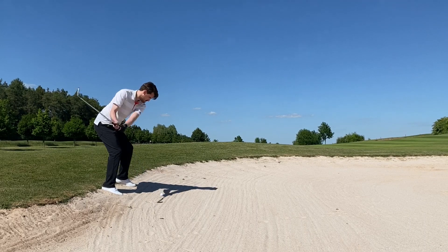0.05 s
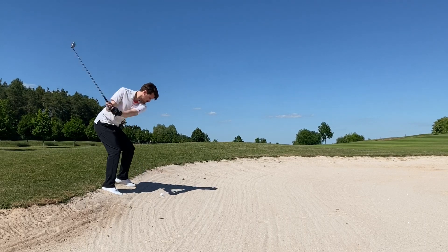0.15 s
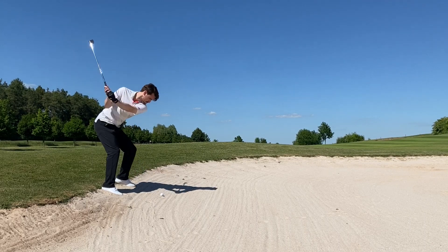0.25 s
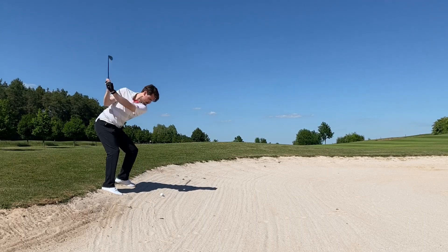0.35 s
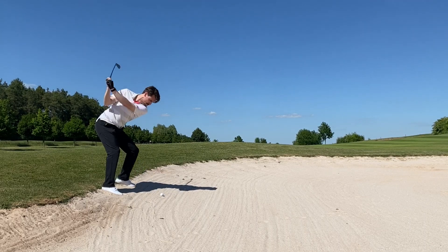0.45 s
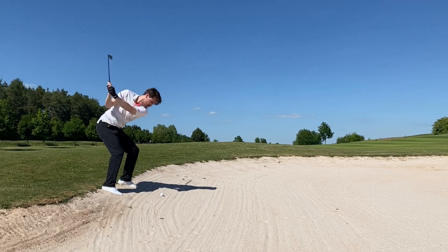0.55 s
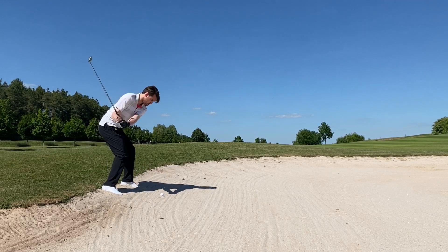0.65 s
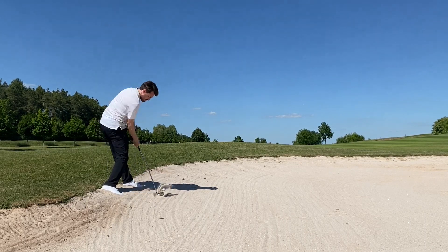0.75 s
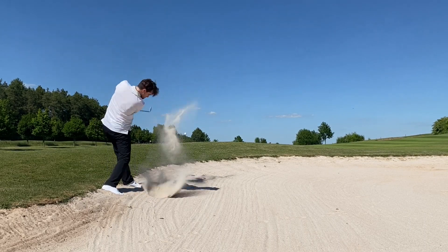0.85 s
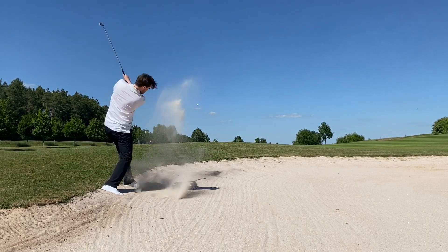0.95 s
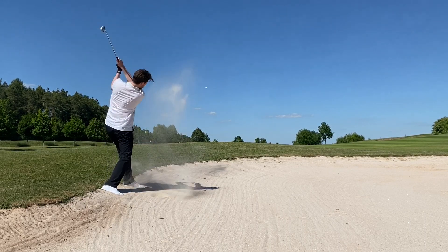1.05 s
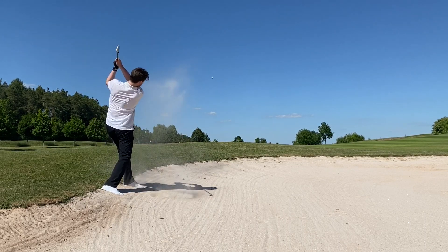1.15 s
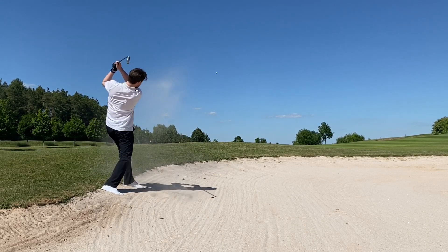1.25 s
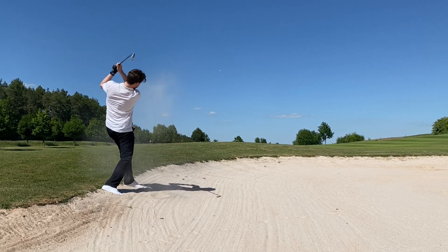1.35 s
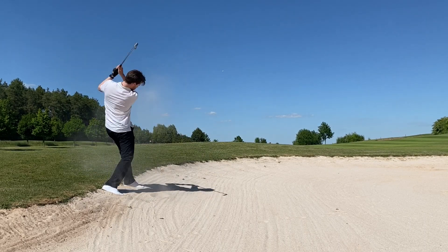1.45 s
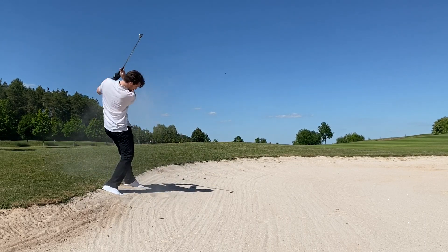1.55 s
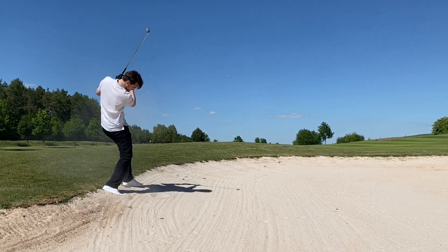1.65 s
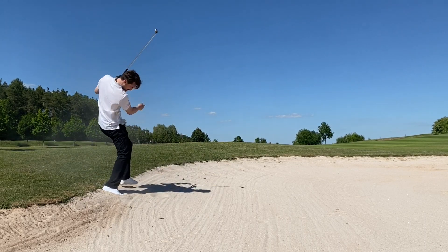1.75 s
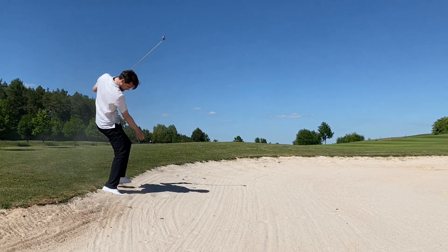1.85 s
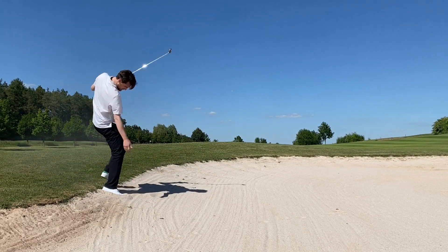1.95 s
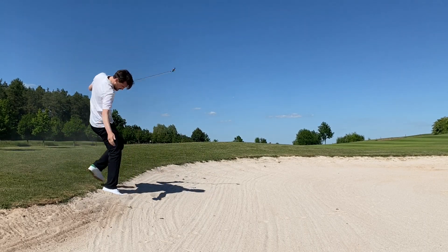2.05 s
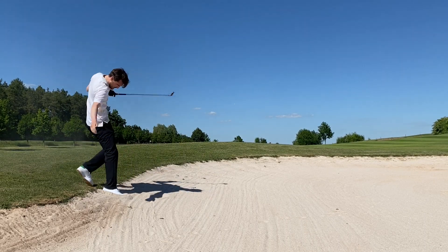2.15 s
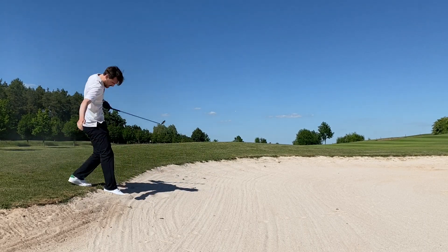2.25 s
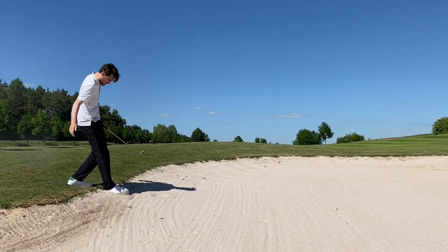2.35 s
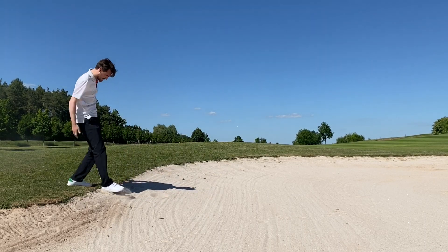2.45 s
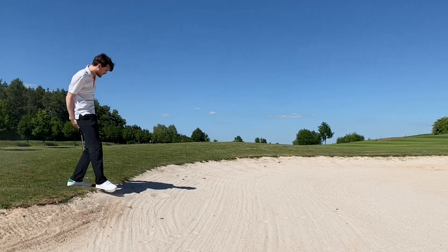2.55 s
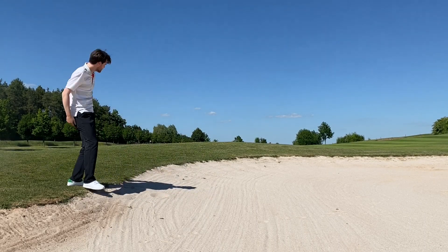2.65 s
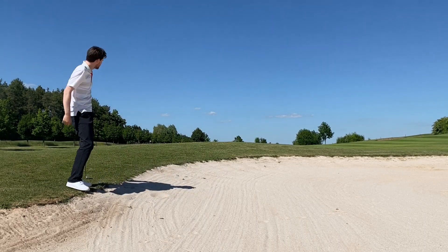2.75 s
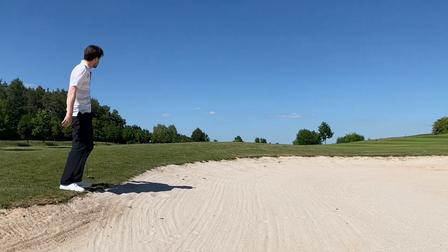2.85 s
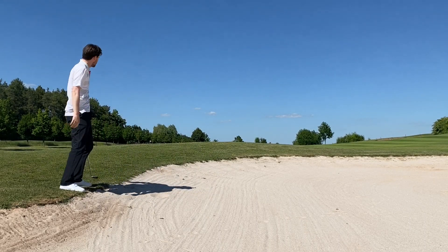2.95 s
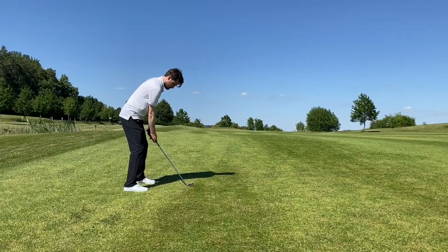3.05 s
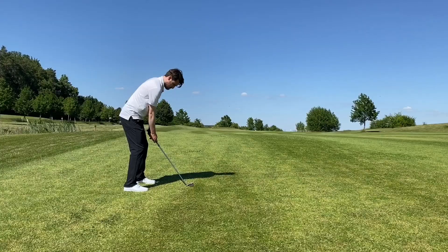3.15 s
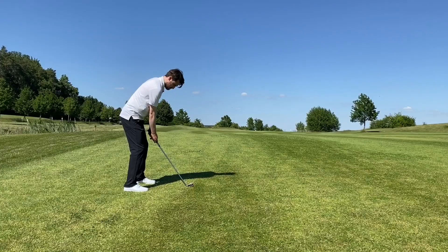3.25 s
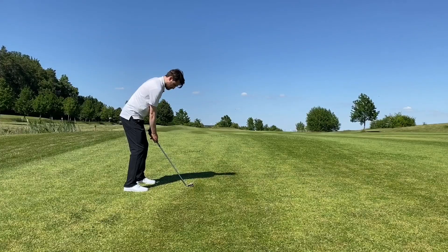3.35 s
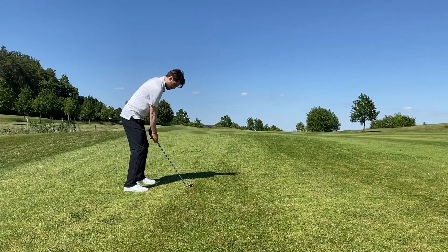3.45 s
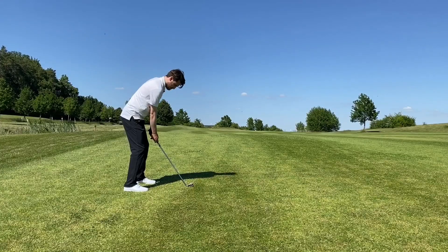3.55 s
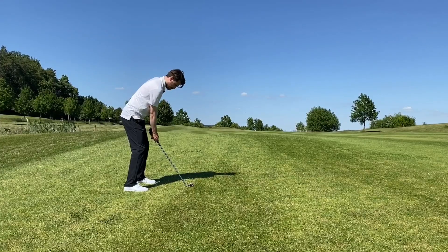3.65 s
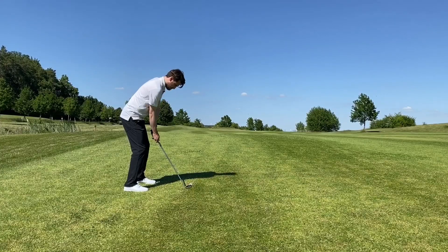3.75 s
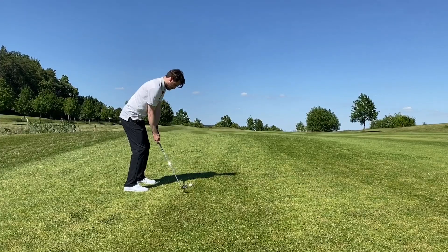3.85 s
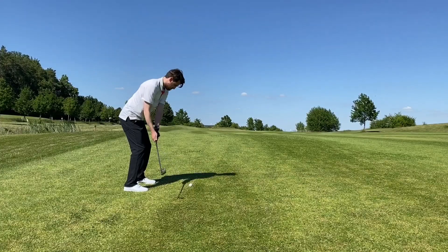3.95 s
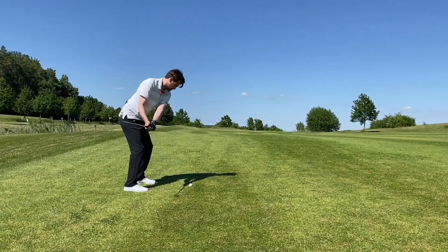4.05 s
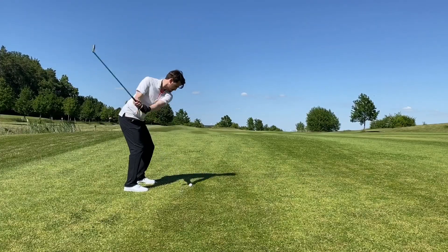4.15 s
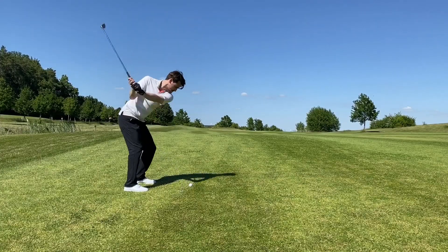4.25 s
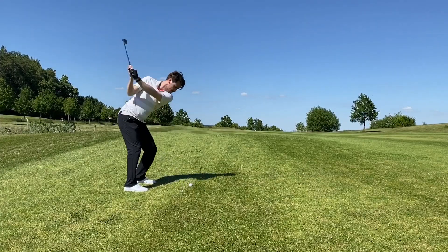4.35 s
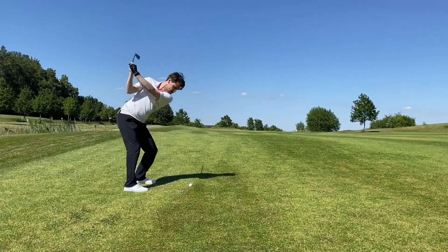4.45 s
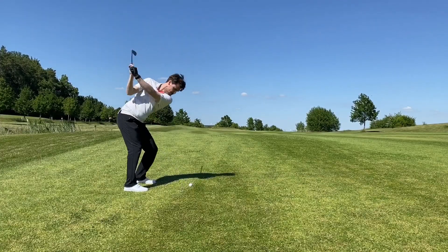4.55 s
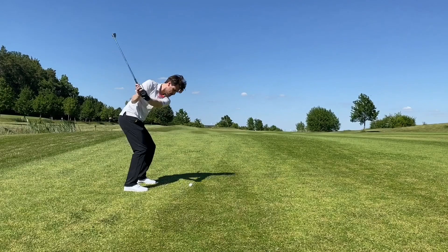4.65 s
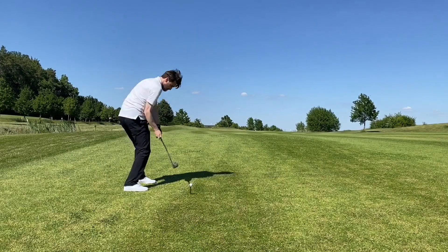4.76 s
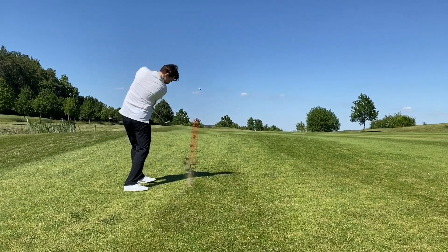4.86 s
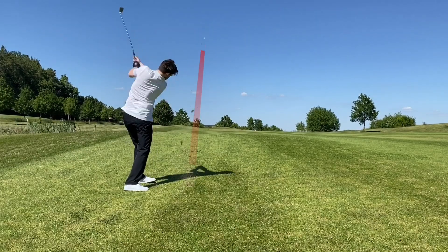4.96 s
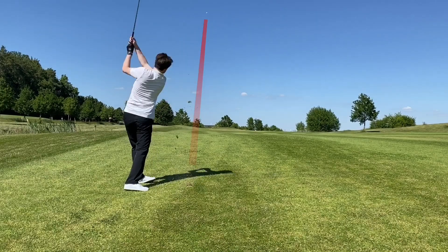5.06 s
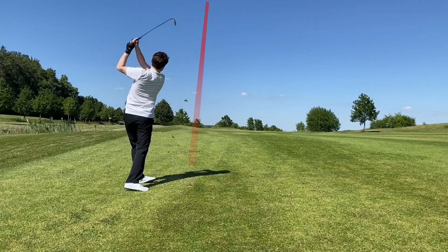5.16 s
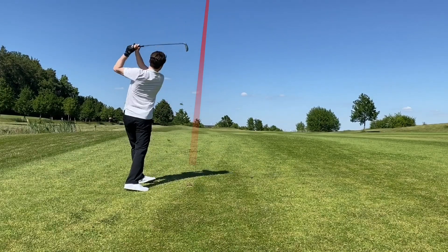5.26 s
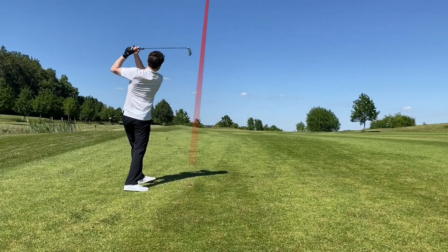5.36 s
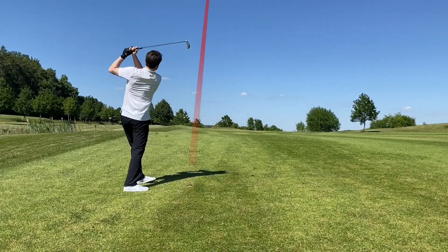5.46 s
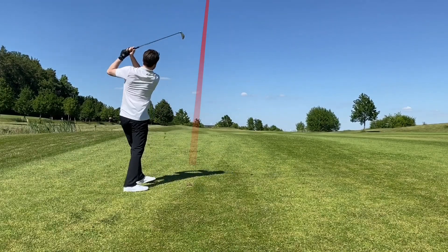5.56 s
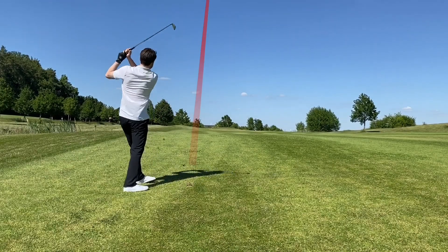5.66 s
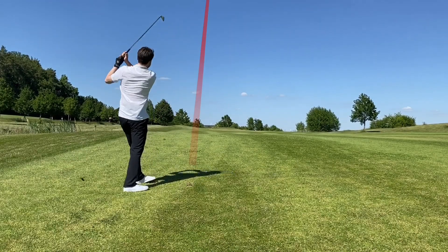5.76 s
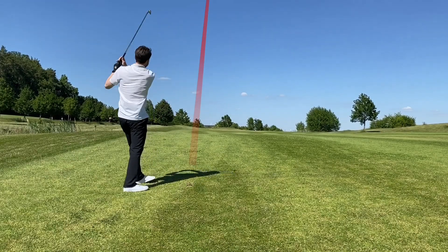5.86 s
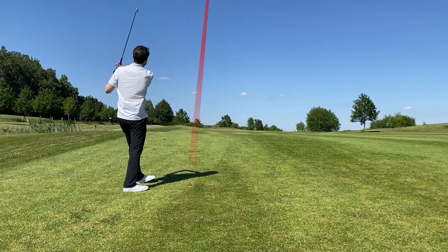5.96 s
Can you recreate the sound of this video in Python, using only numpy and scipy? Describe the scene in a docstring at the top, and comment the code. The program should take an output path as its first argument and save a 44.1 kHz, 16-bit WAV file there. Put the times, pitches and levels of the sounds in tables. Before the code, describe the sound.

On an open golf course, a club swishes and hits sand with a short, thudding crack and a quick grainy spray. Soft rustles follow, then a duller knock of club on shoe. After a change of place, another swish ends in a brighter, sharper iron strike. Small birds whistle faintly, foliage hisses, and wind rumbles low on the stereo microphone, a few metres from the golfer.

```python
"""Golf shots on an open course

A bunker shot throws sand, a club knocks on a shoe, then an iron strikes off the fairway.
Swings are speed-driven noise and shaft tone; blows are filtered impulses, grit noise and damped modes.
Wind is shaped noise with low pressure pulses at the microphone.
Small birds whistle along pitch contours, scattered by the edge of a wood."""
import sys
import numpy as np
from scipy import signal
from scipy.fft import rfft, irfft, next_fast_len
from scipy.io import wavfile
from scipy.ndimage import map_coordinates

SR = 44100
rng = np.random.default_rng(int(sys.argv[2]) if len(sys.argv) > 2 else 0)


def wav_out(sig):
    """Save sig, one row per channel (or a flat mono array), as 16-bit PCM at SR to the path in sys.argv[1]."""
    wavfile.write(sys.argv[1], SR, np.round(np.clip(np.atleast_2d(sig).T, -1, 1) * 32767).astype(np.int16))


N = 264375


def amp(db):
    """Level in decibels to amplitude ratio."""
    return 10 ** (np.asarray(db) / 20)


def unit(x):
    """Normalisation to a root-mean-square of 1."""
    return x / np.sqrt(np.mean(x ** 2) + 1e-20)


def along(points, hz):
    """Interpolation of (frequency [Hz], value) points on a logarithmic frequency axis."""
    f, v = np.transpose(points)
    return np.interp(np.log(hz + 1), np.log(f), v)


def curves(rows):
    """Linear interpolation in time: one value per sample for each column after the time."""
    s, *cols = np.transpose(rows)
    return [np.interp(np.arange(N) / SR, s, c) for c in cols]


def filtered(x, response):
    """Linear filtering: the spectrum of x times a response of frequency."""
    m = next_fast_len(N + SR // 2)
    return irfft(rfft(x, m) * response(np.fft.rfftfreq(m, 1 / SR)), m)[..., :N]


def dull(x, hz):
    """Causal second-order low-pass, with its cutoff held below the Nyquist frequency."""
    return signal.lfilter(*signal.butter(2, min(hz, SR / 2 - SR / 20), fs=SR), x)


def noise(spectrum, grain_db=0):
    """Coloured noise of rms 1; uneven sample sizes make it gritty."""
    grain = amp(grain_db * np.clip(rng.standard_normal(N), -2, 2))
    white = rng.standard_normal(N) * grain
    return unit(filtered(white, lambda hz: amp(along(spectrum, hz))))


def add(track, s, sound):
    """Superposition of a short sound onto a track from time s."""
    part = track[max(round(s * SR), 0):][:len(sound)]
    part += sound[:len(part)]


def since(s):
    """Seconds elapsed after time s, zero before it."""
    return np.maximum(np.arange(N) / SR - s, 0)


def bump(s, width):
    """A Gaussian swell that peaks at 1 at time s."""
    return np.exp(-((np.arange(N) / SR - s) / width) ** 2)


def swell(t, rise):
    """An envelope that peaks at 1 after rise seconds and dies away."""
    return t / rise * np.exp(1 - t / rise)


def wobble(rate):
    """Slow random modulation: a smooth curve through rate random knots a second."""
    knots = rng.standard_normal(int(N * rate / SR) + 4)
    return map_coordinates(knots, [np.arange(N) * rate / SR])


def pushes(rows, stretch):
    """Low pressure pulses whose period lengthens as they die."""
    out, t = np.zeros(N), np.arange(SR // 5) / SR
    for s, db, hz, rise in rows:
        cycles = np.log1p(stretch * hz * t) / stretch
        add(out, s, amp(db) * swell(t, rise) ** 1.2 * np.sin(2 * np.pi * cycles))
    return out


def eddies(strength_db, count=36):
    """Turbulent pressure: a few strong eddies, and small ones by chance that follow the wind's strength."""
    # strongest eddies: (time [s], level [dB], start frequency [Hz], rise [s])
    strong = [(.222, -43.5, 302, .0066), (.477, -43.5, 304, 0.0035), (1.398, -43, 302, 0.0049),
              (1.986, -41, 349, .0048), (2.121, -41, 297, 0.0069), (3.198, -42.5, 330, 0.0055),
              (3.282, -43.5, 300, .011), (3.345, -42.5, 420, .0055), (3.591, -39.5, 400, 0.009),
              (3.715, -43, 453, 0.011), (3.741, -36, 482, .01), (4.517, -40.5, 179.7, .012),
              (4.76, -33.5, 335, .011), (4.792, -34.5, 150, .018), (4.875, -33.5, 242, .012),
              (4.8995, -20, 420, .0105), (5.044, -31, 257, .012)]
    small_db, small_hz, small_rise_s = 4, 340, .006  # level over the wind's strength, mid pitch, rise
    chance = []
    for u, size in rng.random((count, 2)):
        level_db = strength_db[int(u * N)] + small_db
        chance.append((u * N / SR, level_db, small_hz * 2 ** (size - .5), small_rise_s))
    return pushes([*strong, *chance], stretch=.522)


def wind():
    """Turbulence: rumble, flutter growing faster in gusts, eddies, and a rush of opposite polarity at two ports."""
    # steady breeze: (time [s], strength [dB])
    breeze = [(0.0, -66), (0.5, -61.5), (0.92, -63), (1.62, -62.5), (2.03, -53), (2.43, -55.5),
              (2.74, -61.5), (2.92, -61.5), (3.52, -50.5), (3.7, -49.5), (3.94, -60.5), (4.07, -59),
              (4.74, -55.5), (4.87, -49.5), (4.97, -51.5), (5.29, -60), (5.57, -59.5), (5.99, -55)]
    # gusts: (time of peak [s], strength over the breeze [dB], half-width [s])
    gusts = [(.26, 7.5, 0.038), (1.06, 5.5, 0.096), (1.4, 4.5, .08), (2.62, 4.5, 0.072), (2.96, 6, .05),
             (3.29, 4, .1), (3.735, 11, 0.042), (3.87, 4.5, 0.044), (4.215, 7.5, .035), (5.83, 5.5, .04)]
    # spectra of the deep rumble and the flutter: (frequency [Hz], density [dB per Hz])
    rumble_colour = [(15, -32.5), (28, -13), (45, 1), (70, 2), (110, -2.5), (170, -9.5), (280, -18.5),
                     (450, -43), (800, -75)]
    flutter_colour = [(60, -28), (150, -8.5), (290, 0.5), (400, -6), (600, -21.5), (1200, -43),
                      (3000, -69.5)]
    # spectrum of the wind's opposed rush: (frequency [Hz], density [dB per Hz])
    rush_colour = [(150, -50), (300, -15.5), (520, -0.5), (950, 1), (1500, -11.5), (3000, -24.5),
                   (8000, -44.5)]

    strength_db = curves(breeze)[0] + sum(db * bump(s, width) for s, db, width in gusts)
    lumps = unit(amp(2.2 * wobble(28)))
    rumble = amp(strength_db + 1) * noise(rumble_colour)
    flutter = amp(1.604 * strength_db + 19) * noise(flutter_colour)
    opposed = np.array([[1], [-1]])  # opposite polarity at the two ports
    rush = amp(0.74 * strength_db - 36.5) * noise(rush_colour) * opposed
    return lumps * (rumble + flutter) + rush + eddies(strength_db)


def air():
    """Diffuse sound: independent left and right foliage noise by place, and a faint high hiss at 14 to 16 kHz."""
    # spectra of distant foliage at each place: (frequency [Hz], density [dB per Hz])
    bunker_colour = [(210, -34.5), (350, -4.5), (505, -8.5), (652, -8), (1210, -11), (1310, -15.5),
                     (1520, -7.5), (2740, -14.5), (3060, -15), (5340, -23.5), (6070, -25), (7960, -32),
                     (11500, -35), (15800, -50.5)]
    fairway_colour = [(210, -41), (350, -6.5), (513, -2), (621, -8), (940, -10.5), (1640, -19.5),
                      (2960, -16), (3650, -19.5), (4780, -20), (6570, -27.5), (7840, -36), (11500, -39),
                      (13300, -43.5), (15800, -49)]
    # stretches of faint high hiss: (start [s], length [s], level [dB], fading [dB per s])
    hisses = [(.8, 2.1, -85.5, 4.5), (4.65, 1.34, -91.5, 6)]
    move_s, bunker_db, fairway_db = 3.06, -75, -71.5  # change of place, foliage level at each

    bunker = np.array([noise(bunker_colour), noise(bunker_colour)])
    fairway = np.array([noise(fairway_colour), noise(fairway_colour)])
    trees = np.where(np.arange(N) / SR < move_s, amp(bunker_db) * bunker, amp(fairway_db) * fairway)
    hiss = noise([(11000, -31), (14300, -1.5), (15700, -2), (16200, -31.5)])
    hiss_gain = np.zeros(N)
    for s, length, db, fading in hisses:
        sounding = (since(s) > 0) * (since(s) < length)
        hiss_gain += sounding * amp(db - fading * since(s))
    return amp(.5 * wobble(3)) * trees + hiss_gain * hiss


def whistle(hz):
    """Frequency modulation: a softly rounded pure note whose phase integrates a pitch contour."""
    envelope = np.sqrt(np.abs(np.sin(np.linspace(0, np.pi, len(hz)))))
    return envelope * np.sin(2 * np.pi * np.cumsum(hz) / SR)


def note(length, start_hz, middle_hz, end_hz):
    """A whistle whose pitch follows a parabola through three frequencies."""
    u = np.linspace(0, 1, max(int(length * SR), 2))
    contour = np.polyfit([0, .5, 1], [start_hz, middle_hz, end_hz], 2)
    return whistle(np.polyval(contour, u))


def slur(length, hz, slide):
    """A whistle that starts off its final pitch and settles on it along a Gaussian glide."""
    t = np.arange(int(length * SR)) / SR
    slide_s = min(0.44 * length, 0.027)  # a share of a short note, limited in a long one
    return whistle(hz * (1 + slide * np.exp(-(t / slide_s) ** 2)))


def phrase(count=7):
    """Pitch contours in sequence: strokes, then a sinking, fading trill with small random variations."""
    # two upstrokes, the second arched:
    # (time in phrase [s], length [s], start [Hz], middle [Hz], end [Hz], relative level [dB])
    strokes = [(0, .02, 2250, 2430, 2650, -1), (.02, .05, 2420, 2990, 2783, 0)]
    trill_after_s, trill_gap_s, trill_note_s = .075, .0165, .014
    base_hz, first_lift, fall = 2257, .2, 0.24  # lift and fall as shares of the pitch
    fade_db = 1.5  # loss a note

    out = np.zeros(SR // 2)
    for s, length, start, middle, end, db in strokes:
        add(out, s, amp(db) * note(length, start, middle, end))
    for k in range(count):
        hz = base_hz * (1 + first_lift * np.exp(-k) + rng.normal(0, .012))
        falling = note(trill_note_s, hz, hz * (1 - fall / 2), hz * (1 - fall))
        start = trill_after_s + k * trill_gap_s + rng.normal(0, .001)
        add(out, start, amp(rng.normal(0, 1) - fade_db * k) * falling)
    return out


def wood_echo(x, t60):
    """Scattering by trunks: convolution with an exponentially decaying tail, different on each side."""
    t = np.arange(SR // 2) / SR
    tail = rng.standard_normal((2, len(t))) * np.exp(-np.log(1000) * t / t60)
    return signal.fftconvolve(x[None], tail / np.linalg.norm(tail[0]), axes=1)[:, :N]


def birds():
    """Tonal song, near and far, joined by its reverberation among the trees."""
    # whistles that glide to a pitch:
    # (time [s], length [s], final pitch [Hz], starting offset [share of pitch], relative level [dB])
    slurs = [(.1, .1, 3296, 0.13, -68), (0.199, .06, 3000, .12, -70), (0.271, 0.052, 3620, .09, -70.5),
             (0.327, .1, 2926, .27, -63.5), (.53, 0.11, 3265, 0.093, -66.5),
             (.99, 0.078, 3220, 0.084, -67.5), (1.2, .08, 3040, 0.13, -71.5), (1.46, .14, 3250, 0.057, -74),
             (2.451, 0.058, 3130, 0.087, -66.5), (2.674, .048, 2850, .15, -65),
             (2.786, .049, 4880, .14, -66), (3.347, 0.044, 2690, .36, -62.5),
             (3.435, .06, 3230, 0.025, -68.5), (4.26, .075, 2470, .18, -70.5),
             (4.928, 0.078, 3120, .09, -69.5), (5.28, .16, 2520, -.06, -71.5),
             (5.475, .09, 3095, 0.027, -72), (5.725, .11, 3010, 0.15, -68), (5.915, .05, 3880, .11, -73),
             (5.955, .045, 3200, 0.072, -69.5)]
    # sharp falling chips: (time [s], relative level [dB])
    chips = [(2.581, -64), (2.728, -66), (2.822, -62)]
    # shape of every chip: (length [s], start [Hz], middle [Hz], end [Hz])
    chip_shape = (.015, 4920, 4130, 3100)
    # each singing of the warbled phrase: (time [s], relative level [dB])
    warbles = [(3.657, -58.5), (4.14, -61.5)]
    # single calls: (time [s], length [s], start [Hz], middle [Hz], end [Hz], relative level [dB])
    bent_calls = [(3.391, .066, 2960, 3235, 2580, -61), (3.916, .012, 2640, 2400, 2150, -59),
                  (3.947, .04, 2996, 2960, 2700, -68), (3.96, .05, 1894, 2180, 1750, -62)]
    # twitters deep in the wood:
    # (time [s], length [s], mean pitch [Hz], sweep to each side [share of pitch], relative level [dB])
    twitters = [(.5, .031, 5400, .12, -75.5), (.62, .14, 5140, .08, -81.5), (1.862, .034, 3980, 0.13, -78),
                (1.947, .035, 3650, .12, -76), (3.12, .14, 4790, .07, -77), (3.32, .025, 3810, 0.084, -70),
                (3.523, .035, 5060, .1, -75)]

    song, far = np.zeros(N), np.zeros(N)
    for s, length, hz, slide, db in slurs:
        add(song, s, amp(db) * slur(length, hz, slide))
    for s, db in chips:
        add(song, s, amp(db) * note(*chip_shape))
    for s, db in warbles:
        add(song, s, amp(db) * phrase())
    for s, length, start, middle, end, db in bent_calls:
        add(song, s, amp(db) * note(length, start, middle, end))
    for s, length, hz, sweep, db in twitters:
        for start in np.arange(s, s + length, .013):
            pitch = hz * np.exp(0.058 * rng.standard_normal())
            rising = note(.018, pitch * (1 - sweep), pitch, pitch * (1 + sweep))
            add(far, start, amp(db + rng.normal(0, 2)) * rising)
    song = song * amp(1.8 * wobble(70))  # moving air makes the song flutter
    near = amp(-4) * song + amp(-6) * wood_echo(song, t60=0.46)
    return near + amp(-5) * far + wood_echo(far, t60=0.3)


def swings():
    """Aerodynamic noise: the head tears the air while the shaft sheds a hollow tone that follows its speed."""
    # (time of top speed [s], half-width of speed peak [s], swish level [dB],
    #  shaft tone at top speed [Hz], shaft tone level [dB], downswing whisper level [dB])
    strokes = [(.793, .055, -51.5, 385, -53, -70), (4.636, .048, -50.5, 520, -54.5, -82)]
    # spectrum of the torn air: (frequency [Hz], density [dB per Hz])
    swish_colour = [(150, -33.5), (250, -5), (492, -3), (684, -9.5), (918, -5), (1740, -13), (1870, -18),
                    (2110, -11.5), (3090, -15.5), (5480, -25.5), (15800, -42.5)]
    swish_power, shaft_bend = 3.0, .25  # swish amplitude and shaft pitch as powers of speed
    shaft_lag_s, shaft_width_s = .045, .075  # the shaft sings on into the follow-through
    whisper_lead_s, whisper_width_s = .13, 0.13  # the slower start of the downswing

    out, swish = np.zeros(N), noise(swish_colour)
    # slow random modulation spreads the tone into a narrow band
    spread = np.array([unit(dull(rng.standard_normal(N), hz=65)) for _ in range(2)])
    for s, width, swish_db, hz, shaft_db, whisper_db in strokes:
        speed = 1 / (1 + ((np.arange(N) / SR - s) / width) ** 2)
        phase = 2 * np.pi * np.cumsum(hz * speed ** shaft_bend) / SR
        tone = unit(spread[0] * np.cos(phase) + spread[1] * np.sin(phase))
        whisper = amp(whisper_db) * bump(s - whisper_lead_s, whisper_width_s)
        torn = amp(swish_db) * speed ** swish_power + whisper
        out += torn * swish
        out += amp(shaft_db) * bump(s + shaft_lag_s, shaft_width_s) * tone
    return out


def ring(s, modes, attack):
    """Modal decay: damped sinusoids set going at time s by a contact that builds up softly."""
    out, t = np.zeros(N), np.arange(SR // 10) / SR
    tone = np.zeros(len(t))
    for hz, db, t60 in modes:
        tone += amp(db) * np.exp(-np.log(1000) * t / t60) * np.sin(2 * np.pi * hz * t)
    add(out, s, tone * (1 - np.exp(-t / attack)) ** 2)
    return out


def blows():
    """Impact: each blow is a crack with its ground reflection, crushed grit and a very short modal ring."""
    # hard contacts: (time [s], impulse level [dB], low-pass cutoff [Hz])
    clicks = [(0.8134, -7, 2200), (.818, -18, 2500), (2.5545, -14, 1600), (2.5592, -20, 1700),
              (4.6639, -7, 17500)]
    # grit crushed under club or shoe: (time [s], level [dB], rise [s], low-pass cutoff [Hz])
    crunches = [(.8138, -41, .00041, 17000), (.8168, -36.5, .0018, 2400), (.8165, -43.5, .0013, 17000),
                (2.381, -61, 0.0019, 1300), (2.5495, -48.5, 0.0018, 2700), (2.5538, -41, .0021, 1550),
                (2.5535, -51.5, 0.0021, 13000), (4.6636, -32.5, .0014, 17000), (4.6643, -23, .0012, 2400),
                (4.922, -63.5, 0.0041, 14000)]
    # modes of each struck body: (frequency [Hz], level [dB], decay time t60 [s])
    wedge = [(390, -26, 0.013), (642.4, -29, .015), (850, -23.5, .018), (1392, -26.5, 0.018),
             (1680, -31.5, .02), (2045, -42, .02), (2920, -44.5, .02)]
    wedge_face = [(9940, -18.5, .008), (10470, -14.5, 0.01)]
    shoe = [(682, -31.5, 0.024), (830, -30.5, 0.025), (1275, -41, 0.026), (1664, -29.5, 0.027),
            (2080, -36.5, .018), (2600, -39.5, 0.02), (3700, -60, .018)]
    iron = [(345, -19.5, 0.022), (520, -30.5, 0.0072), (1000, -25.5, 0.019), (1450, -14.5, 0.015),
            (1840, -26, .012), (2400, -21, 0.01), (2750, -27, 0.017), (3277, -35, .028),
            (7040, -42.5, 0.014)]
    ground_s = .000588  # delay of the ground reflection

    out, t = np.zeros(N), np.arange(SR // 20) / SR
    for s, db, hz in clicks:
        crack = amp(db) * dull(t == 0, hz)
        add(out, s, crack)
        add(out, s + ground_s, 1.3 * crack)
    for s, db, rise, hz in crunches:
        grit = unit(dull(rng.standard_normal(len(t)), hz))
        add(out, s, amp(db) * swell(t, rise) * grit)
    out = signal.lfilter(*signal.butter(1, 350, "high", fs=SR), out)  # small things radiate little bass
    bunker = ring(.8174, wedge, attack=0.00023) + ring(.8165, wedge_face, attack=.002)
    return out + bunker + ring(2.5541, shoe, attack=0.00015) + ring(4.6652, iron, attack=0.00015)


def thumps():
    """Low thumps of club head or shoe on the ground, as short pulses whose period lengthens."""
    # (time [s], level [dB], start frequency [Hz], rise [s])
    ground_thumps = [(.8145, -26.5, 382, 0.0027), (.8215, -30, 190, .0037), (2.528, -43.5, 400, 0.0067),
                     (2.588, -42, 480, 0.0086), (4.6665, -27.5, 370.3, .005)]
    return pushes(ground_thumps, stretch=0.45)


def sand():
    """Granular noise: thrown grains patter in clumps until all have landed, and sand rustles softly."""
    # sand and turf thrown by each shot: (time [s], level [dB], thinning [dB per s], time in flight [s])
    sprays = [(.815, -59.5, 27, .25), (4.666, -57.5, 115, 0.24)]
    # rustles as the cloud settles and the golfer steps: (time of peak [s], level [dB], half-width [s])
    scuffs = [(1.3, -66, .055), (1.5, -76, .08), (2.0, -80, 0.26), (2.29, -67.5, 0.08), (2.62, -73.5, 0.06),
              (2.87, -71.5, 0.051), (2.99, -76.5, .06)]
    # spectra of spray and rustle: (frequency [Hz], density [dB per Hz])
    spray_colour = [(240, -28), (400, -2), (528, -7.5), (991, -3.5), (1100, -7.5), (1980, -3), (2460, -8.5),
                    (3340, -9), (7670, -12.5), (13500, -17), (15800, -18)]
    scuff_colour = [(240, -32), (400, 2), (665, -7), (799, -11), (1810, -8.5), (3500, -18.5), (5380, -24.5),
                    (6680, -26.5), (7320, -33), (14600, -25.5), (15800, -26)]
    rise_s, landed_db_per_s = 0.0028, 135  # onset, and extra fading once the flight is over

    flying = np.zeros(N)
    for s, db, thinning, flight in sprays:
        level_db = db - thinning * since(s) - landed_db_per_s * since(s + flight)
        flying += (1 - np.exp(-since(s) / rise_s)) * amp(level_db)
    shifting = sum(amp(db) * bump(s, width) for s, db, width in scuffs)
    spray = flying * amp(1.6 * wobble(60)) * noise(spray_colour, grain_db=5)
    scuff = shifting * amp(1.3 * wobble(50)) * noise(scuff_colour, grain_db=4)
    return spray + scuff


def from_left(x):
    """Interaural-like cues: level and phase of the golfer's sound differ between two ports in each band."""
    # level difference between the ports: (frequency [Hz], left minus right [dB])
    balance = [(60, 0.0), (130, 0.0), (290, 3.0), (640, 3), (1410, 2.0), (3100, 1.0), (6820, 0),
               (15000, -0.5)]
    # phase lead at the left port: (frequency [Hz], lead [radians])
    lead = [(220, 0), (520, .5), (1800, .6), (2800, .1), (4800, -1.5), (5800, -1.8), (7000, -1.2),
            (7700, -1.9), (9600, -.85), (15000, -.45)]

    def half(hz):
        """Half of the difference goes to each port, with opposite signs."""
        return amp(along(balance, hz) / 2) * np.exp(.5j * along(lead, hz))

    return filtered(x, lambda hz: np.array([half(hz), 1 / half(hz)]))


def scene():
    """Superposition: golfer in front and a little left, the wood's faint answer, birds, trees and wind."""
    golfer = swings() + blows() + thumps() + sand()
    width = amp(-16.5) * sand() * np.array([[1], [-1]])  # opposite polarity widens the sand
    answer = amp(-30) * wood_echo(dull(golfer, hz=4000), t60=.8)
    return wind() + air() + birds() + from_left(golfer) + width + answer


def record(dry):
    """Band limiting: a very steep low-pass at 16.1 kHz without phase shift."""
    return filtered(dry, lambda hz: 1 / np.sqrt(1 + (hz / 16100) ** 160))


dry = scene()
out = record(dry)
wav_out(out)
```